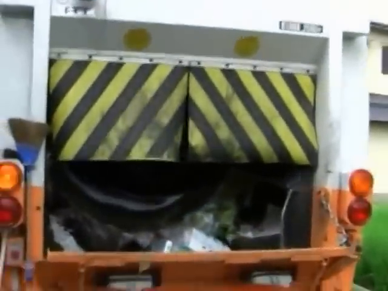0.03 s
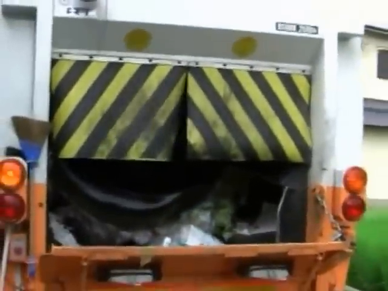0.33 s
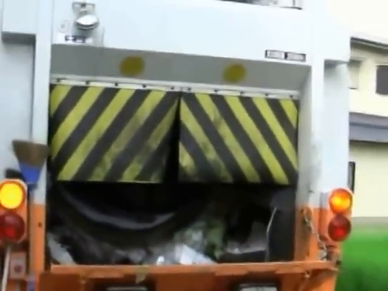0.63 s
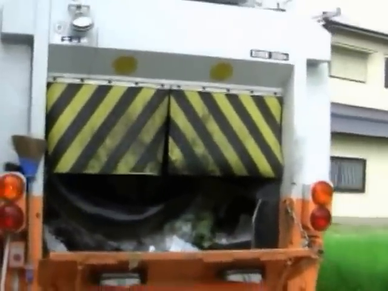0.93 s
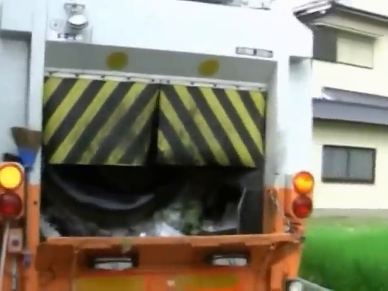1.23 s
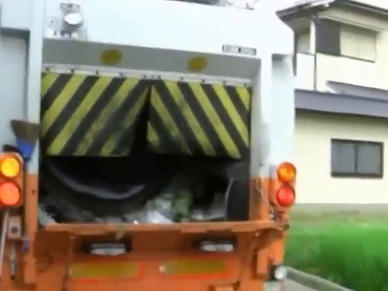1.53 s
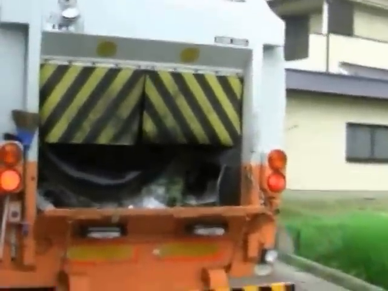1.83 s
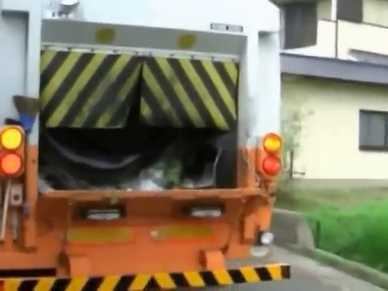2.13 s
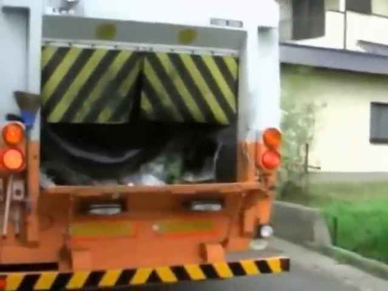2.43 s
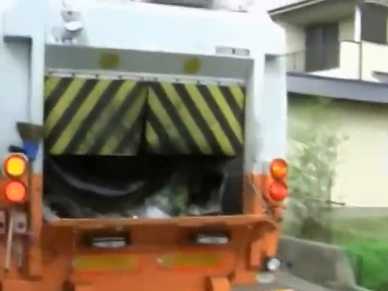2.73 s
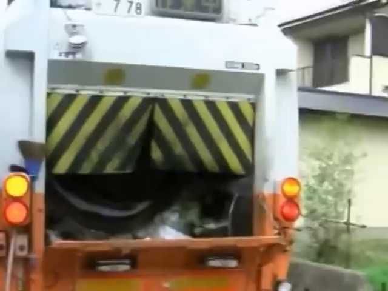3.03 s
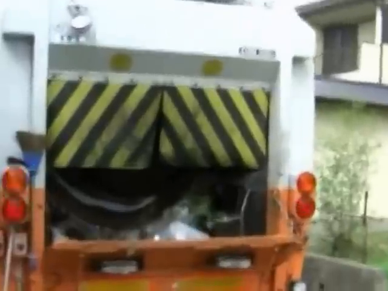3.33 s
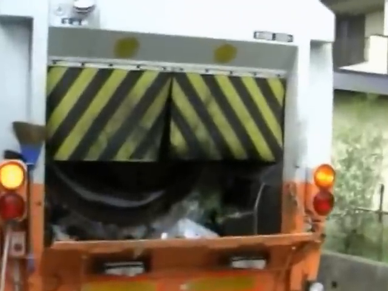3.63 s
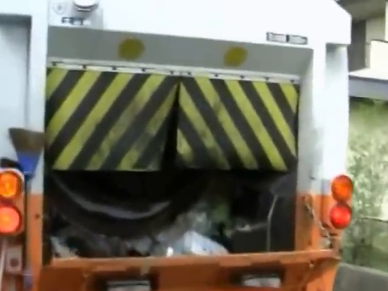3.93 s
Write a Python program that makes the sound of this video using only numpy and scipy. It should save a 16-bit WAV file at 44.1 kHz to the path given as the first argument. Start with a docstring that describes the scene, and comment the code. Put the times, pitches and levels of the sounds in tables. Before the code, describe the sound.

Garbage truck drum rumbling with tumbling, scraping rubbish while the engine revs and idles.

```python
"""In a street, just behind the open loading drum of a refuse truck.
The diesel's firings form a pulse train that speeds up, sinks to idle and speeds up again.
The steel drum turns and rumbles, its resonances driven by the tumbling load. Sliding friction
makes the rubbish hiss in surges and stick-slip motion makes it squeak; hard pieces drop, knock
and set the drum's steel wall ringing, and two light ones clink."""
import sys
import numpy as np
from scipy import signal
from scipy.fft import rfft, irfft
from scipy.io import wavfile

SR = 44100
rng = np.random.default_rng(int(sys.argv[2]) if len(sys.argv) > 2 else 0)


def wrap_up_sound(samples):
    """Save the sound to the file named by the first command line argument, as 16-bit audio."""
    columns = np.atleast_2d(samples).T
    # keep every value between -1 and 1, then stretch to whole-number steps
    tamed = np.clip(columns, -1, 1)
    steps = np.round(tamed * 32767).astype(np.int16)
    wavfile.write(sys.argv[1], SR, steps)


N = 176400
T = np.arange(N) / SR
HZ = np.arange(N // 2 + 1) * SR / N + 1e-3


def undb(db):
    """Amplitude ratio of a level in decibels."""
    return 10 ** (np.asarray(db) / 20)


def unit(x):
    """Normalisation to an rms of one."""
    return x / np.sqrt(np.mean(x ** 2))


def curve(points):
    """Linear interpolation through (time_s, value) points."""
    return np.interp(T, *np.array(points).T)


def colour(points):
    """Frequency response through (frequency_hz, gain_db) points."""
    hz, db = np.array(points).T
    return undb(np.interp(np.log(HZ), np.log(hz), db))


def band(hz, width_hz):
    """Frequency response of a damped resonator."""
    return 1 / (1 + 1j * (HZ ** 2 - hz ** 2) / (HZ * width_hz))


def shape(x, response):
    """Linear filtering, normalised to an rms of one."""
    return unit(irfft(rfft(x) * response, N))


def noise():
    """Gaussian white noise."""
    return rng.standard_normal(N)


def walk(cutoff_hz):
    """Slow random fluctuation: low-passed noise with an rms of one."""
    return shape(noise(), 1 / (1 + (HZ / cutoff_hz) ** 4))


def grains(per_s, spread_db):
    """Shot noise: tiny random contacts of unequal strength."""
    size = undb(spread_db * np.minimum(rng.exponential(size=N), 5))
    return (rng.random(N) < per_s / SR) * size * rng.choice([-1, 1], N)


def envelope(start_s, attack_s, length_s, release_s):
    """Linear rise, hold until the length is over, then exponential decay."""
    rise = np.clip((T - start_s) / attack_s, 0, 1)
    return rise * np.exp(-np.maximum(T - start_s - length_s, 0) / release_s)


def engine():
    """Periodic excitation: each firing thumps, puffs gas and rattles the block, over a harmonic hum."""
    # engine speed: time_s, firing_hz
    speed = [(0, 32), (.45, 33.1), (.7, 34.3), (.9, 35.3), (1.19, 39.8), (1.35, 38), (1.6, 30.5),
             (2.05, 24.3), (2.97, 21.5), (3.2, 32), (3.44, 40), (4, 39.4)]
    # relative strength of the four cylinders: gain_db
    cylinders = [0.97, -1, 0.86, -0.93]
    # exhaust pipe response: frequency_hz, gain_db
    pipe = [(20, -45.5), (35, -15.5), (48, -17), (66, -10.5), (105, 1.5), (150, 0), (200, -5.5),
            (300, -29.5), (450, -11.5), (900, -43)]
    # exhaust strength: time_s, level_db
    exhaust_level = [(0, -45), (.45, -53), (.57, -32), (.7, -34), (.85, -25.5), (1.17, -37.5), (1.23, -38),
                     (1.5, -34), (1.9, -39.5), (2.45, -44), (2.6, -45.5), (2.95, -54), (3.12, -29.5),
                     (3.45, -33), (3.7, -35.5), (4, -29)]
    # harmonics of the hum: firing_multiple, gain_db
    orders = [(2, -6), (3, -2), (4, -1), (5, -13), (7, -10), (9, -18), (10, -14), (12, -17)]
    # gain common to those harmonics: time_s, gain_db
    hum_gain = [(0, -39), (.2, -33.5), (.45, -33), (.63, -29.5), (.8, -32), (1.17, -28), (1.26, -38),
                (1.6, -41), (1.9, -49), (2.4, -52), (2.95, -53), (3.15, -34), (3.4, -29), (3.7, -32),
                (4, -30.5)]
    jitter, scatter_db, puff_db, waver_db, clatter_db = .006, 1.8, 1, 2, -42
    puff_cycles, clatter_cycles = .57, .16
    body_hz, body_width_hz, drone_db = 307, 20, 22
    firing_hz = curve(speed)
    cycles = np.cumsum(firing_hz * (1 + jitter * walk(9.2))) / SR
    firings = np.flatnonzero(np.diff(np.floor(cycles)))
    pulses = np.zeros(N)
    pulses[firings] = undb(np.resize(cylinders, len(firings)) + scatter_db * noise()[:len(firings)])
    puffs = noise() * np.exp(-(cycles % 1) / puff_cycles)
    exhaust = shape(unit(pulses) + undb(puff_db) * unit(puffs), colour(pipe))
    clatter = shape(noise() * np.exp(-(cycles % 1) / clatter_cycles), band(1300, 2100) ** 2)
    hum = 0
    for order, db in orders:
        # the truck body drones when a harmonic crosses its resonance
        detuning = 2 * (order * firing_hz - body_hz) / body_width_hz
        drone = 1 + undb(drone_db) / np.hypot(1, detuning) ** 2.42
        amplitude = undb(db + waver_db * walk(4)) * drone
        hum += amplitude * np.sin(2 * np.pi * (order * cycles + rng.random()))
    exhaust *= undb(curve(exhaust_level))
    return exhaust + hum * undb(curve(hum_gain)) + undb(clatter_db) * clatter


def steel(ring_db):
    """Modal superposition: the drum's resonances add to the direct sound."""
    # modes of the steel drum: pitch_hz, width_hz, gain_db
    modes = [(362, 190, -1.5), (663, 55, -5.5), (787, 137, -1), (1103, 56, -3.5), (1384, 62, -6),
             (1500, 27, -3), (1574, 24, -1), (2230, 22, -14.5), (2560, 18, -7), (2764, 45, -8),
             (2880, 41, -0.5), (3088, 32, 1)]
    return 1 + undb(ring_db) * sum(undb(db) * band(hz, width) for hz, width, db in modes)


def tumbling():
    """Random impacts of the load on the turning wall merge into a rumble coloured by the steel."""
    # strength of the tumbling: time_s, level_db
    level = [(0, -26), (.45, -27), (.62, -24.5), (.8, -25.5), (1.15, -24), (1.3, -42), (1.37, -30.5),
             (1.43, -22), (1.5, -27), (1.6, -25.5), (1.79, -29), (2.03, -28), (2.11, -29), (2.35, -28),
             (2.6, -31.5), (2.79, -29.5), (2.92, -26.5), (3.2, -24.5), (4, -23)]
    # spectrum of the impacts: frequency_hz, gain_db
    spectrum = [(60, -20), (170, 3), (300, -5.5), (500, -2), (780, -1), (1100, -0.5), (1550, -1.5),
                (2100, -4), (3000, -9), (4500, -12.5), (6500, -21.5), (8000, -28.5)]
    flicker_db, thud_hz, full_thud_db, extra_db_per_db = .5, 600, -27, .8
    impacts = grains(per_s=3500, spread_db=.7) * undb(flicker_db * walk(30))
    rumble = shape(impacts, colour(spectrum) * steel(ring_db=-1.5))
    # in gentle motion the low thuds fade faster than the rest
    thuds = irfft(rfft(rumble) / (1 + (HZ / thud_hz) ** 6), N)
    thud_gain = undb(extra_db_per_db * np.minimum(curve(level) - full_thud_db, 0))
    return (rumble + thuds * (thud_gain - 1)) * undb(curve(level))


def groan():
    """Forced vibration: the drum's shell groans in its low modes under the load."""
    # low modes of the shell: pitch_hz, width_hz, gain_db
    modes = [(264, 120, 10), (323.6, 15, -0.5)]
    # strength of the groan: time_s, level_db
    level = [(0, -47), (.17, -32.5), (.45, -31.5), (.56, -27), (.74, -32.5), (.82, -29.5), (.98, -27),
             (1.22, -38), (1.42, -32), (1.58, -31), (1.8, -40.5), (2.45, -38), (2.6, -46.5), (3.05, -34),
             (4, -42)]
    shell = sum(undb(db) * band(hz, width) for hz, width, db in modes)
    return shape(noise(), shell * band(303, 250)) * undb(curve(level))


def scrapes():
    """Sliding friction: dense tiny contacts of bags on the wall hiss, crunch and make the steel sing."""
    # slides: start_s, length_s, level_db, crunch_re_hiss_db
    slides = [(-.02, 0.067, -23.5, -22), (0.114, 0.1, -24.5, -5.5), (0.21, 0.061, -26.5, -10),
              (0.284, 0.15, -26.5, -12.5), (0.556, .045, -29.5, 1), (0.715, 0.042, -25, -3),
              (0.842, 0.046, -31, 4), (0.975, 0.053, -24, -25), (1.142, .11, -23.5, -3.5),
              (1.267, 0.026, -23.5, 2), (1.409, 0.043, -30.5, 1.5), (1.524, 0.039, -24.5, -0.5),
              (1.655, 0.032, -31, -4), (1.779, 0.11, -23, -9), (1.9, 0.12, -26.5, -2),
              (2.178, 0.069, -27.5, -8), (2.595, 0.027, -29.5, -10), (2.8, 0.074, -25.5, 4),
              (2.944, 0.057, -26, -3.5), (3.07, 0.051, -27.5, -1.5), (3.15, 0.095, -25, -13),
              (3.276, 0.084, -26, -3.5), (3.408, 0.12, -32.5, -3), (3.527, 0.1, -25.5, -8.5),
              (3.637, 0.042, -24.5, -21), (3.749, 0.055, -26, -17), (3.824, 0.053, -36, 2)]
    # spectrum of the hiss: frequency_hz, gain_db
    hiss_spectrum = [(300, -27.5), (900, -11), (1700, -4.5), (2300, -2), (3100, 0), (3700, -3),
                     (5000, -7.5), (6500, -11.5), (8000, -20)]
    # spectrum of the crunch: frequency_hz, gain_db
    crunch_spectrum = [(100, -20.5), (300, -11.5), (700, -4), (1100, 0.5), (1550, 0), (2200, 1.5),
                       (3500, -43.5), (8000, -26)]
    sing_hz, sing_db = 3094, -21.5
    wall = steel(ring_db=-.5)
    hiss = shape(grains(per_s=9000, spread_db=1.7), colour(hiss_spectrum) * wall)
    hiss += undb(sing_db) * shape(noise(), band(sing_hz, 290) ** 2 * wall)
    crunch = shape(grains(per_s=2600, spread_db=2.1), colour(crunch_spectrum) * wall)
    hiss_power, crunch_power = 0, 0
    for start, length, db, crunch_db in slides:
        power = (undb(db) * envelope(start, .029, length, release_s=.041)) ** 2
        hiss_power += power
        crunch_power += power * undb(crunch_db) ** 2
    return hiss * np.sqrt(hiss_power) + crunch * np.sqrt(crunch_power)


def squeaks():
    """Stick-slip oscillation: rubbish on steel gives short tones that waver in pitch and level."""
    # squeaks: start_s, length_s, pitch_hz, level_db
    rubs = [(0, .05, 2804, -35), (0.16, 0.045, 3240, -39), (0.33, 0.053, 3180, -31),
            (.335, 0.075, 2850, -32), (1.163, .04, 2910, -38), (1.21, .08, 2800, -37),
            (1.2, 0.069, 1604, -33), (1.973, 0.026, 1478, -28), (2.03, 0.031, 1492, -31.5),
            (2.614, 0.034, 3040, -38), (3.09, 0.026, 2960, -31.5), (3.176, .03, 3030, -33),
            (3.209, 0.05, 2840, -36.5), (3.22, 0.06, 1605, -34), (3.225, .035, 1315, -30.5)]
    pitch_waver, waver_db = .005, 2
    out = np.zeros(N)
    for start, length, hz, db in rubs:
        grip = walk(55)
        tone = np.sqrt(2) * np.sin(2 * np.pi * np.cumsum(hz * (1 + pitch_waver * grip)) / SR)
        out += tone * undb(db + waver_db * grip) * envelope(start, .005, length, release_s=.034)
    return out


def knocks():
    """Impact excitation: hard pieces ring hollowly, soon damped by the load; the struck wall rings on."""
    # blows: start_s, level_db, cutoff_hz, lower_note_hz, upper_note_hz, hollow_db, decay_s, ring_share
    blows = [(1.178, -27, 694, 377, 590, 14, .008, 0), (1.272, -25.5, 500, 270, 318, 21, .012, 0),
             (1.289, -22, 2410, 1620, 1900, 19, 0.0072, 0.06),
             (1.703, -19, 1370, 905, 1350, 8.4, 0.016, 0.087),
             (1.729, -22.5, 1010, 880, 1120, 13, 0.012, 0.3), (2.04, -22.5, 894, 306, 835, 9, 0.019, 0.3),
             (2.174, -12, 1400, 510, 2200, 22, .0035, 0), (2.187, -15.5, 1400, 560, 2230, 26, .004, 0),
             (2.82, -19.5, 1700, 326, 1420, 13, 0.013, 0.33),
             (2.826, -16, 1500, 705, 1450, 16.1, 0.0083, 0.44),
             (2.834, -21, 1690, 330, 1680, 15, .014, 0.58), (2.853, -20.5, 1610, 392, 1670, 13, .012, 0.11),
             (2.87, -22, 1820, 380, 1430, 23, 0.01, 0.065), (2.879, -17.5, 1780, 336, 1410, 11, .01, 0.81),
             (2.891, -16, 1310, 664, 746, 8.9, 0.0064, 0.29), (2.98, -23, 885, 676, 805, 27, .009, 0.85),
             (3.094, -19, 1000, 268, 693, 8.7, 0.012, 0.15), (3.11, -23, 970, 510, 1250, 20, 0.019, .3),
             (3.544, -13.5, 900, 342, 745, 15, 0.0081, 0.099),
             (3.559, -16, 1590, 347, 870, 20, 0.013, 0.66),
             (3.565, -15.5, 2370, 1520, 2050, 19, 0.014, 0.3), (3.584, -18.5, 500, 338, 372, 13, .011, 0)]
    low_cut_hz, hollow_q, tail_s = 293, 9, .03
    tail_db, strike_db, ring_db = -29.5, 2.5, -2.5
    body = steel(ring_db=3) / (1 + low_cut_hz / (1j * HZ) - (low_cut_hz / HZ) ** 2)
    out = np.zeros(N)
    for start, db, cutoff_hz, lower_hz, upper_hz, hollow_db, decay_s, ring_share in blows:
        age, struck = np.maximum(T - start, 0), T >= start
        fade = struck * (np.exp(-age / decay_s) + undb(tail_db) * np.exp(-age / tail_s))
        impulse = np.diff(1. * struck, prepend=0)
        force = unit(fade * noise()) + undb(strike_db) * unit(impulse)
        contact = 1 / (1 + 1.3j * HZ / cutoff_hz - (HZ / cutoff_hz) ** 2)
        hollow = 1 + undb(hollow_db) * sum(band(hz, hz / hollow_q) for hz in (lower_hz, upper_hz))
        out += undb(db) * np.sqrt(np.mean(fade ** 2)) * shape(force, body * contact * hollow)
        ringing = struck & (T < start + .5)
        out[ringing] += ring_share * undb(db + ring_db) * wall_ring(age[ringing])
    return out


def wall_ring(age):
    """Free vibration: the drum wall's modes decay, a little different in pitch at every blow."""
    # modes of the struck steel wall: pitch_hz, t60_s, gain_db
    modes = [(332, .14, -7), (377, .16, -7), (695, .24, -4), (755, .5, -3), (1435, .2, -8), (1626, .2, -11)]
    ring = 0
    for hz, t60, db in modes:
        pitch_hz = hz * (1 + .0088 * rng.standard_normal())
        ring += undb(db) * np.exp(-np.log(1000) * age / t60) * np.sin(2 * np.pi * pitch_hz * age)
    return ring


def clinks():
    """Damped resonance: light pieces give brief bursts of high, band-limited noise."""
    # light pieces: start_s, centre_hz, width_hz, level_db, decay_s
    pieces = [(2.795, 5200, 1500, -31, 0.07), (3.508, 6800, 3600, -24, 0.0016)]
    return sum(undb(db) * envelope(start, .0015, .0017, decay) * shape(noise(), band(hz, width) ** 2)
               for start, hz, width, db, decay in pieces)


def stereo(x, lag_s):
    """Path difference: sound reaches the right first; house reflections make the sides' treble differ."""
    diffuse_db, diffuse_hz = -7, 5500
    spectrum = rfft(x)
    half_lag = np.exp(-1j * np.pi * HZ * lag_s)
    echoes = noise() * envelope(.003, .002, .005, release_s=.025)
    echoes /= np.sqrt(np.sum(echoes ** 2))
    treble_tilt = np.minimum(HZ / diffuse_hz, 1.3) ** .92 + .017
    side = spectrum * rfft(echoes) * undb(diffuse_db) * treble_tilt
    return np.array([irfft(spectrum * half_lag - side, N), irfft(spectrum / half_lag + side, N)])


def scene():
    """Superposition of the sources at two close points, with a little air moving over each."""
    air_hz, air_db = 45, -74.5
    air = np.array([shape(noise(), band(air_hz, 70) ** 2) for _ in range(2)])
    truck = stereo(engine(), lag_s=4.5e-5)
    truck += stereo(tumbling() + groan() + knocks() + squeaks() + clinks(), lag_s=2.8e-5)
    truck += stereo(scrapes(), lag_s=3e-5)
    return truck + undb(air_db) * air


def record(dry):
    """Band limiting: a steep elliptic low-pass removes the top treble."""
    cutoff_hz = 7800
    return signal.sosfilt(signal.ellip(10, .2, 75, cutoff_hz, fs=SR, output="sos"), dry)


dry = scene()
out = record(dry)
wrap_up_sound(out)
```